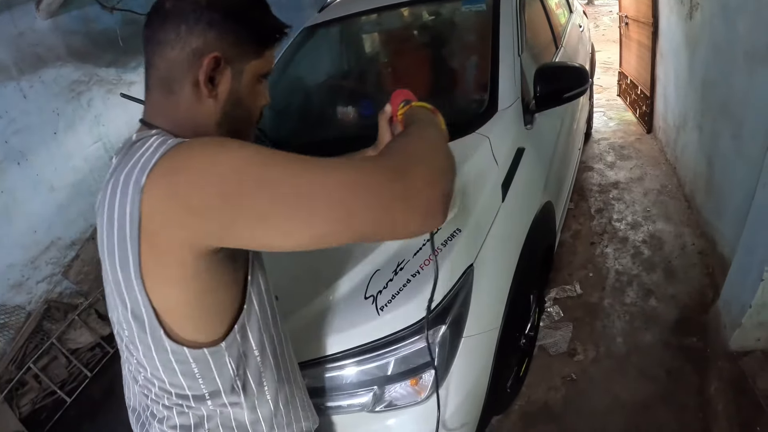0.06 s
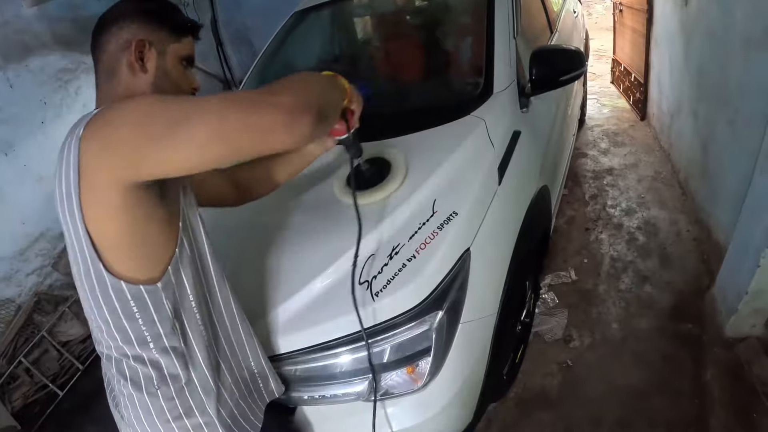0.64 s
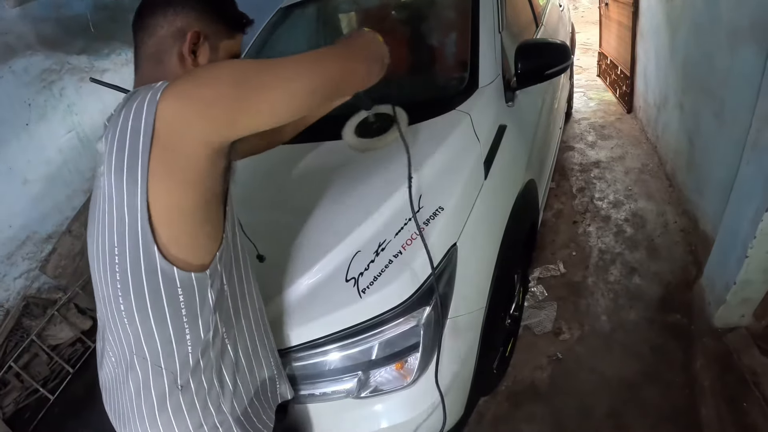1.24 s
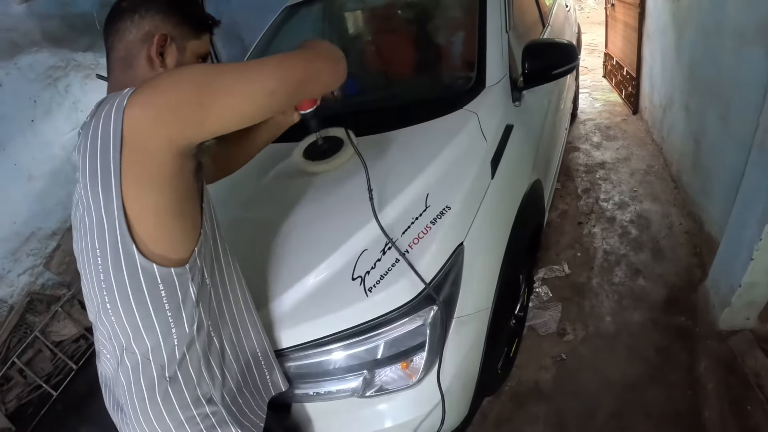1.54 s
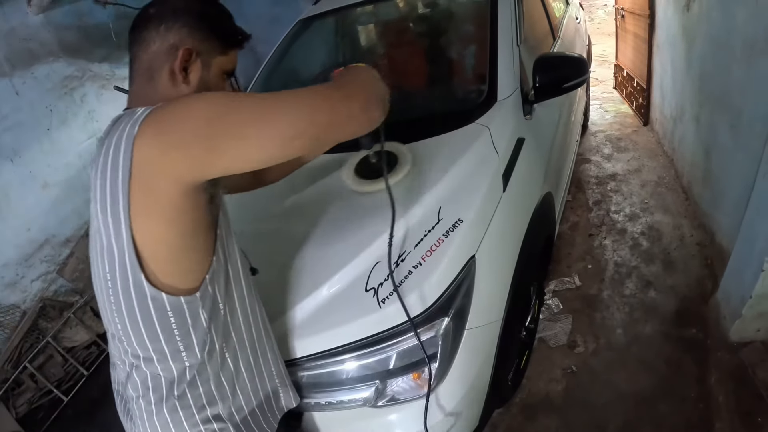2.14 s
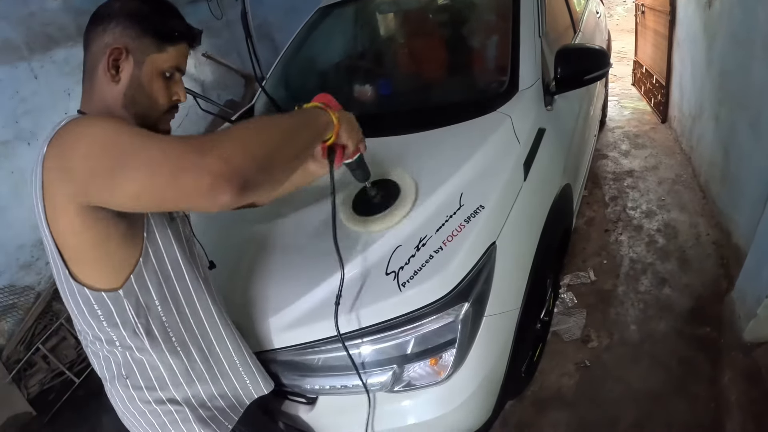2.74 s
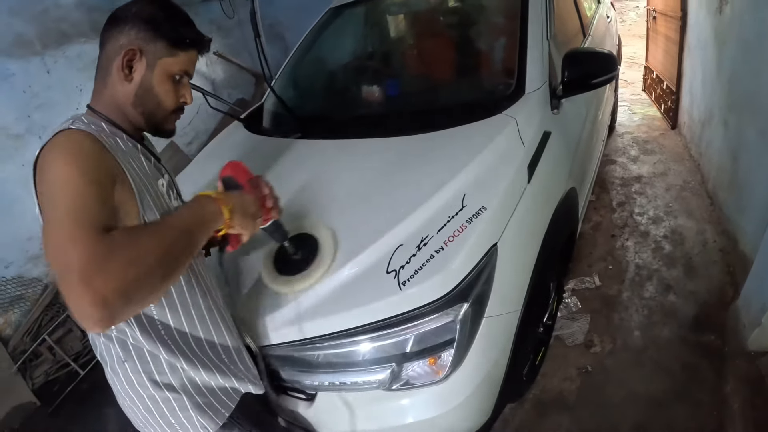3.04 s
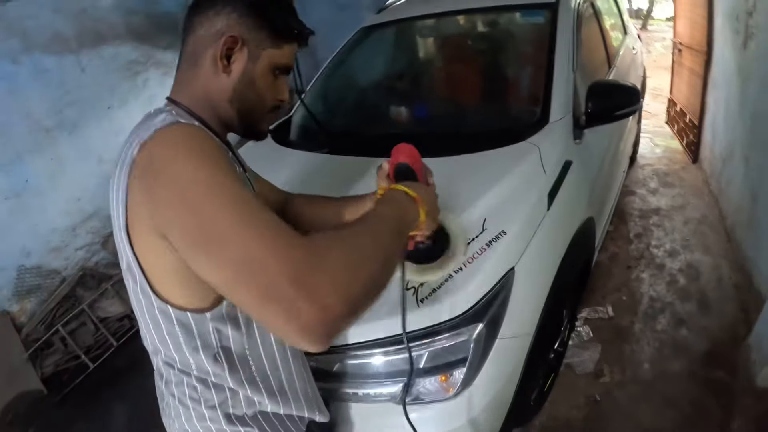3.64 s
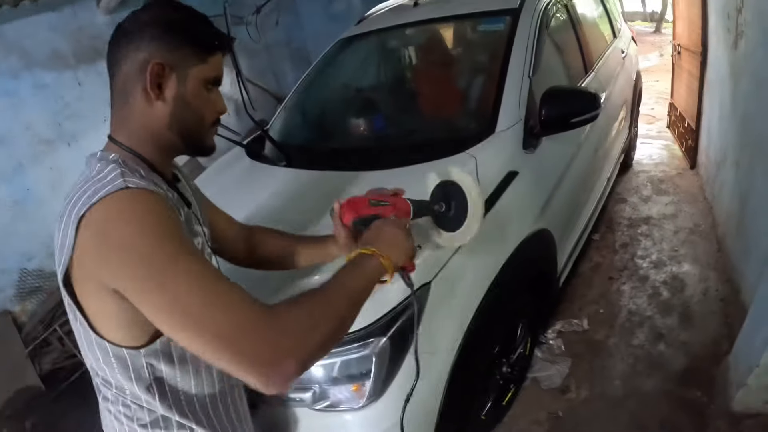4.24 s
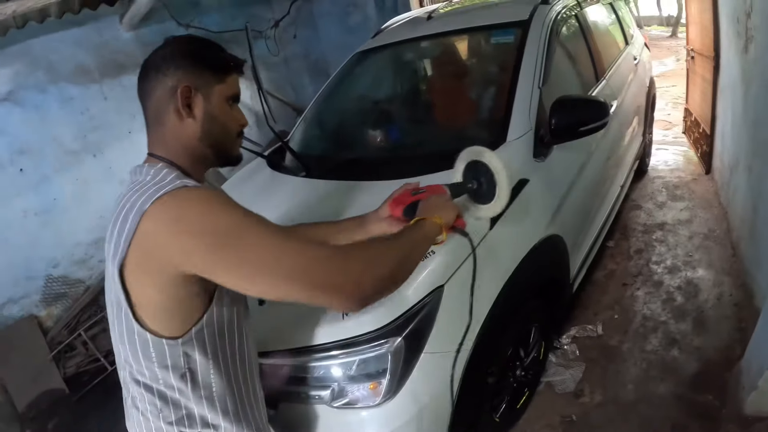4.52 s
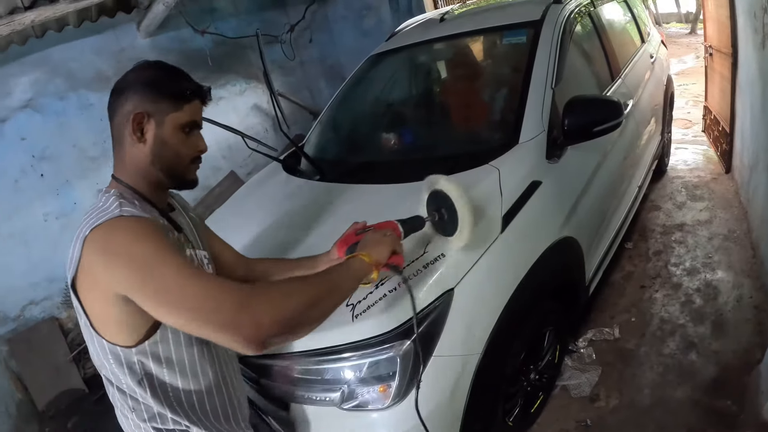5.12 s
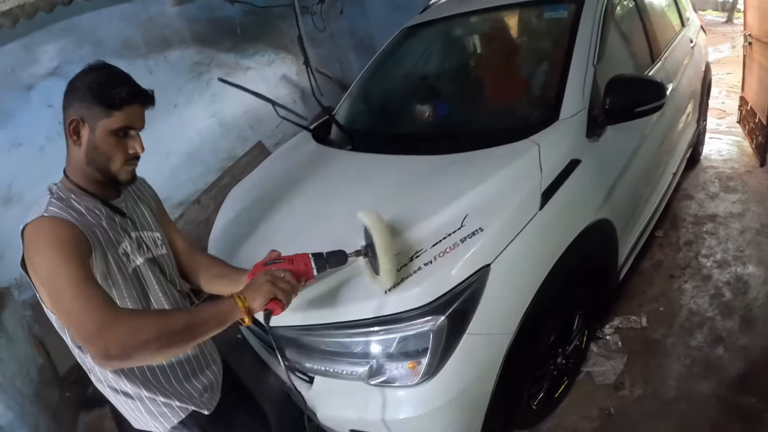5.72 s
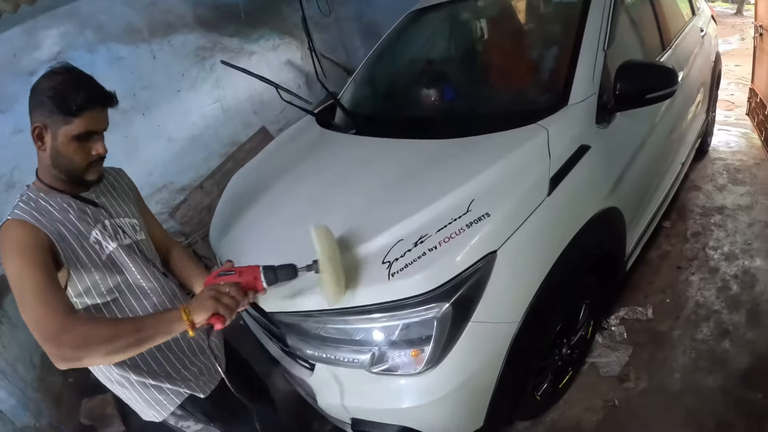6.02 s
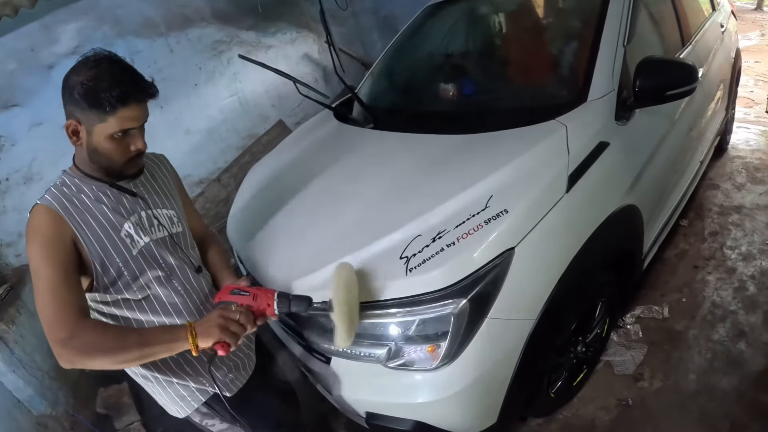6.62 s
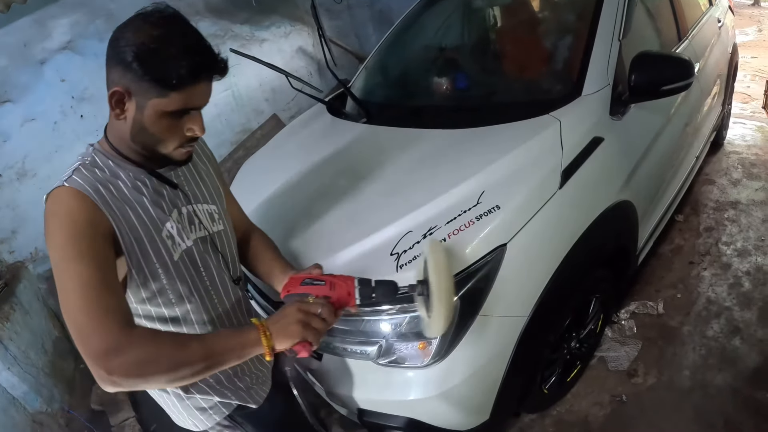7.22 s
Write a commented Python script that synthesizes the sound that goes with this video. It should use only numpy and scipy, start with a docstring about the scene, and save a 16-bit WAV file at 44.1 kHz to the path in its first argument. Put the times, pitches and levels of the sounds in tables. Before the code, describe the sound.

An electric drill runs without a break, spinning a buffing pad over a car bonnet. Its high, rasping gear whine throbs with the pad above a hiss of cooling air. The pitch steps up early on and sags twice under pressure, then settles slightly lower. Brief swells of hiss come and go, and the pad rubs faintly. The mono microphone is a few steps away in a narrow covered yard with a faint outdoor rumble.

```python
"""Buffing a car bonnet in a covered yard

An electric drill spins a buffing pad between close plaster walls; a mono microphone is a few steps off.
The motor sings at multiples of its shaft rate, stepping with the trigger and sagging when the pad is
pressed down. The gears whine and throb with each turn of the pad, and the hiss of cooling air changes as
the tool leans and turns. Brief narrow bands of hiss swell and fade over the drill's whine, and the pad
rubs on the panel above a faint outdoor rumble."""
import sys
import numpy as np
from scipy import signal
from scipy.fft import rfft, irfft, next_fast_len
from scipy.io import wavfile
from scipy.ndimage import uniform_filter1d, map_coordinates

SR = 44100
rng = np.random.default_rng(int(sys.argv[2]) if len(sys.argv) > 2 else 0)


def wav_out(sig):
    """Save sig, one row per channel (or a flat mono array), as 16-bit PCM at SR to the path in sys.argv[1]."""
    wavfile.write(sys.argv[1], SR, np.round(np.clip(np.atleast_2d(sig).T, -1, 1) * 32767).astype(np.int16))


N = 320607
T = np.arange(N) / SR
FFT_SIZE = next_fast_len(N)
FREQ = np.maximum(np.arange(FFT_SIZE // 2 + 1) * SR / FFT_SIZE, 1)
GEAR_RATIO = 18  # shaft turns to one turn of the pad
# pressure on the pad: (time [s], speed lost [%])
PAD_LOAD = [(0.0, 0.6), (0.42, 0.7), (0.5, 1.47), (0.56, 7.6), (0.62, 11.8), (0.7, 6.9), (0.8, 3.7),
            (0.86, 3.27), (1.06, 2.36), (1.2, 1.04), (1.44, 1.25), (1.54, 2.2), (1.64, 0.8), (1.8, 0.3),
            (1.96, 1.72), (2.16, 1.24), (2.42, 1.35), (2.5, 0.67), (2.6, 0.9), (2.66, 1.95), (2.72, 2.05),
            (2.9, 1.37), (2.98, 1.58), (3.16, 0.99), (3.34, 1.14), (3.44, 11.6), (3.46, 13.2), (3.5, 11.6),
            (3.58, 6.7), (3.7, 5.2), (3.88, 6.61), (4.0, 6.7), (4.2, 1.36), (4.54, 0.12), (4.76, 0.96),
            (4.92, 0.44), (5.38, 2.42), (5.46, 2.33), (6.06, 3.02), (6.26, 4.3), (6.4, 3.4), (6.46, 2.45),
            (6.6, 2.4), (7.02, 3.96), (7.18, 3.74), (7.26, 3.6)]


def shaft_rate():
    """The trigger sets the speed, pressure on the pad drags it down, the rotor's inertia rounds both."""
    # trigger steps: (time [s], unloaded shaft rate [Hz])
    trigger = [(0, 331.1), (.274, 350.5), (1.495, 384.1), (2.627, 410), (5.322, 389.8)]
    starts, step_hz = np.transpose(trigger)
    free_hz = step_hz[np.searchsorted(starts[1:], T)]
    spin_up_s = 0.01
    return uniform_filter1d(free_hz * (1 - curve(PAD_LOAD) / 100), int(spin_up_s * SR))


def motor(turns, hz):
    """Magnetic pull hums on even orders, the housing rings and the brushes cross the commutator bars."""
    # two-pole hum: (time [s], level [dB])
    pole_hum = [(0, -82), (.4, -77.5), (.65, -82), (1.05, -84.5), (1.4, -82), (1.62, -75), (1.8, -82.5),
                (2.05, -83), (2.45, -72.5), (2.78, -79.5), (3.12, -70.5), (3.75, -79), (4.2, -79.5),
                (5.1, -81.5), (5.55, -78.5), (5.9, -83), (6.15, -89), (6.45, -80), (6.8, -93), (7.27, -84)]
    # its octave: (time [s], relative level [dB])
    hum_octave = [(0, -62.5), (.3, -57), (.7, -64), (1.4, -67.5), (1.65, -60), (2, -68), (2.35, -58),
                  (2.9, -60.5), (3.2, -53.5), (3.5, -64.5), (3.85, -63), (4.15, -73), (4.45, -62),
                  (5.2, -67.5), (5.8, -68), (6.35, -59), (6.95, -67.5), (7.27, -61.5)]
    # sixth-order whistle: (time [s], level before ringing [dB])
    whistle = [(0, -55.5), (.45, -61), (.65, -63.5), (.88, -55.5), (1.05, -60.5), (1.65, -56.5),
               (1.85, -59), (2.05, -58), (2.4, -64), (2.85, -59.5), (2.98, -55), (3.25, -61), (3.4, -62),
               (3.65, -63), (3.9, -70), (4.12, -63), (4.33, -57), (4.48, -68), (4.7, -70), (5.1, -68),
               (6.15, -77), (6.3, -57.5), (6.55, -66), (6.9, -65), (7.27, -61)]
    # weak lines that come and go as the tool moves: (order [x shaft rate], base level [dB])
    weak_lines = [(8, -69.5), (10, -69), (12, -69), (14, -77.5), (16, -73), (17, -82), (29, -83.5),
                  (31, -77)]
    housing_order, bars = 20, 24
    housing_db = -77 + beam(lean_db=-11, facing_db=30.5) + ringing(housing_order * hz)
    brush_db = -82.5 + beam(lean_db=8, facing_db=19.5) + ringing(bars * hz)
    hum = tone(turns, order=2, db=curve(pole_hum), scatter=0.15, rate=25)
    hum += tone(turns, order=4, db=curve(hum_octave) - 2.5, scatter=0.19, rate=30)
    hum += tone(turns, order=6, db=curve(whistle) + ringing(6 * hz), scatter=0.42, rate=110)
    housing = tone(turns, order=housing_order, db=housing_db, scatter=0.55, rate=120)
    brushes = tone(turns, order=bars, db=brush_db, scatter=0.45, rate=90)
    weak = 0
    for order, db in weak_lines:
        fading_db = 2 * walk(3.57)
        weak += tone(turns, order, db + ringing(order * hz) + fading_db, scatter=0.55, rate=70)
    return hum + housing + brushes + weak


def pinion(turns):
    """Uneven tooth contacts make a rasping whine, harder under load, throbbing once a turn of the pad."""
    # gear whine: (time [s], level with no load [dB])
    mesh_level = [(0, -61), (.15, -58), (.28, -71), (.42, -59), (.52, -63), (.62, -64.5), (.78, -62),
                  (.9, -56.5), (1.02, -56.5), (1.14, -68), (1.36, -70), (1.65, -60), (1.77, -53.5),
                  (1.95, -58.5), (2.08, -68), (2.22, -61), (2.32, -58.5), (2.42, -65), (2.51, -53.5),
                  (2.6, -55), (2.68, -64), (2.93, -76), (3.02, -74), (3.08, -57.5), (3.29, -57.5),
                  (3.36, -66), (3.44, -63), (3.52, -65), (3.59, -70), (3.68, -61), (3.8, -71), (3.9, -63),
                  (4.05, -74), (4.26, -71), (4.41, -57.5), (4.55, -61), (4.67, -67), (4.95, -59),
                  (5.25, -63), (5.4, -63), (5.52, -58), (5.85, -55.5), (5.97, -58.5), (6.16, -60),
                  (6.27, -54.5), (6.36, -58), (6.45, -58), (6.63, -59), (6.78, -59.5), (7.27, -59.5)]
    # its octave: (time [s], level [dB])
    octave_level = [(0, -76), (.25, -59), (.42, -77), (.75, -65), (.88, -57), (1.08, -78), (1.6, -74),
                    (1.9, -63), (2.1, -73), (2.45, -74), (2.8, -71), (3.2, -74), (4.2, -71), (4.45, -67),
                    (4.7, -69), (5.15, -60), (5.3, -59), (5.55, -59), (5.85, -58), (6.1, -70), (6.3, -65),
                    (6.65, -79), (7.27, -75)]
    # swing that the off-centre pad gives the whine: (time [s], depth [0-1])
    wobble = [(0, .28), (.65, 0), (.85, 0.4), (1.05, 0.35), (1.3, 0.2), (1.9, 0.39), (2.6, 0.06), (3, 0.05),
              (5.2, 0.22), (5.5, 0.6), (6.1, 0.57), (6.3, 0.01), (6.9, 0.38), (7.27, 0.53)]
    teeth, db_per_percent = 15, 1.13
    load, depth = curve(PAD_LOAD), curve(wobble)
    mesh_db = curve(mesh_level) + db_per_percent * load
    pad_angle = 2 * np.pi * turns / GEAR_RATIO
    bent_turns = turns + 0.019 * depth * np.cos(pad_angle)  # the pad's load bends the pitch a little
    whine = tone(bent_turns, order=teeth, db=mesh_db, scatter=0.27, rate=320)
    octave = tone(bent_turns, order=2 * teeth, db=curve(octave_level), scatter=1.1, rate=260)
    # an off-centre pinion adds a line on each side, stronger as the load bends its shaft
    runout = 1 + (0.3 + 0.01 * load) * np.cos(2 * np.pi * turns)
    throb = (1 + depth * np.sin(pad_angle)) / np.sqrt(1 + depth ** 2 / 2)
    return (whine * throb + octave * np.sqrt(throb)) * runout


def layshaft(turns):
    """The slower gear stage drones far below the pinion and whines as the pad's edge bites."""
    # low drone: (time [s], level [dB])
    drone_level = [(0, -99), (.45, -92), (.68, -99), (1.2, -93.5), (1.65, -90.5), (2.25, -91), (2.7, -96),
                   (3.3, -91.5), (3.5, -97), (4.5, -92.5), (5.4, -93.5), (5.8, -87), (6.2, -91),
                   (6.45, -88), (6.8, -87), (7, -99), (7.27, -98)]
    # edge whine: (time [s], level [dB])
    edge_level = [(0, -92), (6.05, -81), (6.22, -68), (6.5, -65), (6.68, -64), (6.8, -80), (7.27, -81)]
    mesh_order = 0.586
    drone = tone(turns, order=mesh_order, db=curve(drone_level), scatter=0.25, rate=8)
    drone += tone(turns, order=2 * mesh_order, db=-99.5, scatter=0.5, rate=14)
    return drone + tone(turns, order=8 * mesh_order, db=curve(edge_level), scatter=0.7, rate=70)


def air(turns):
    """Cooling air and brushes hiss; each band beams its own way, pulsing faintly with shaft and pad."""
    # spectrum of the hiss: (frequency [Hz], relative level [dB])
    hiss_colour = [(300, -65), (550, -34.5), (800, -19), (1150, -11.5), (1570, -6.5), (2050, 0.5),
                   (2900, -2.5), (4300, -3), (6200, -3.5), (8100, -1), (10300, -3), (12600, -8.5),
                   (14000, -15.5), (15400, -48)]
    # resonances of housing and vents: (centre [Hz], width [Hz], lift [dB])
    vents = [(1710, 340, 2), (3290, 470, 2), (4760, 300, 1), (7400, 570, 1.5)]
    # bands of the hiss: (centre [Hz], gain on its side [dB], gain facing the microphone [dB])
    bands = [(1130, -3.5, 8.5), (1610, -3, 7.5), (2150, -3.5, 2), (3170, 4, 11.5), (5060, 2.5, 3.5),
             (6080, -0.5, 1.5), (8000, 1, 14.5), (10500, 5.5, 6.5), (12900, 4, 2)]
    # the two lowest bands: (time [s], relative level [dB])
    low_level = [(0, 9), (.45, 7.5), (.7, 3.5), (1.2, 2), (2, 0.5), (2.3, 2.5), (2.85, 0.5), (3.05, 0),
                 (3.48, 0), (3.8, -1), (4.3, -0.5), (5.25, -2), (5.38, 0.5), (5.8, 0), (6.2, -2),
                 (7.27, -4)]
    # the third band: (time [s], relative level [dB])
    mid_level = [(0, -1.5), (.3, -3.5), (.45, -2), (.65, -3), (.9, 0.5), (2.6, 0.5), (3, 0), (4.4, -0.5),
                 (5.6, 3), (5.9, -3.5), (6.2, -1), (6.5, -1.5), (7.27, 0)]
    # the top treble: (time [s], relative level [dB])
    top_level = [(0, -15), (.22, -9), (.45, 0.5), (.85, 2), (1.15, -8.5), (1.4, -1), (1.65, -4),
                 (1.95, 2.5), (2.33, -1.5), (2.55, 1.5), (2.78, 5), (3, 2.5), (3.55, 5.5), (3.8, 3),
                 (3.95, 7), (4.27, 2), (4.65, -1.5), (4.72, -11), (4.8, 2), (5.6, -3.5), (6.6, 1),
                 (7.27, -2)]
    cavities = 1 + sum(resonance(FREQ, hz, width, undb(db) - 1) for hz, width, db in vents)
    spectrum = rfft(rng.standard_normal(FFT_SIZE)) * colour(hiss_colour) * cavities
    log_centres = np.log([hz for hz, _, _ in bands])
    top_shares = np.interp(log_centres, [np.log(7900), log_centres[-1]], [0, 1]) ** 2
    band_db = [beam(lean_db, facing_db) + share * curve(top_level)
               for (_, lean_db, facing_db), share in zip(bands, top_shares)]
    band_db[0] += curve(low_level)
    band_db[1] += curve(low_level)
    band_db[2] += curve(mid_level)
    hiss, flutter_db = 0, 0.3 * walk(90)
    for weights, db in zip(np.eye(len(bands)), band_db):
        band = irfft(spectrum * np.interp(np.log(FREQ), log_centres, weights))[:N]
        flicker_db = 0.65 * walk(40) + 0.35 * walk(5.5)
        hiss += band * level(undb(db + flutter_db + flicker_db))
    pulse = 1 + 0.05 * np.sin(2 * np.pi * turns) + 0.04 * np.sin(2 * np.pi * turns / GEAR_RATIO)
    return level(sliding_notches(reflections(hiss * pulse)), db=-45.8)


def reflections(hiss):
    """A late, inverted path round the tool hollows the hiss; a bounce off the paint adds faint phasing."""
    # path round the tool's body: (time [s], lag [ms], strength [0-1])
    detour_path = [(0, 0.14, 0.26), (2.6, 0.12, 0.14), (2.95, 0.16, 0.23), (3.4, 0.17, 0.4),
                   (3.95, 0.19, 0.22), (4.2, 0.15, 0), (4.7, 0.11, 0.21), (5.3, 0.12, 0.24),
                   (5.55, 0.23, 0.06), (5.8, 0.2, 0.26), (6.02, 0.192, 0.27), (6.15, 0.16, 0.32),
                   (6.3, 0.14, 0.38), (6.45, 0.15, 0.18), (6.7, 0.2, 0.04), (7.27, 0.2, 0.06)]
    times, lag_ms, strength = np.transpose(detour_path)
    detour = np.interp(T, times, strength) * delayed(hiss, np.interp(T, times, lag_ms))
    bounce = undb(-13) * delayed(hiss, ms=0.458 + 0.12 * walk(2))
    return hiss - detour + bounce


def sliding_notches(hiss):
    """Narrow hollows slide through the hiss as the tool moves; a negative depth is a lift."""
    # middle hollow: (time [s], centre [Hz], depth [dB])
    mid_notch = [(0, 4300, -0.5), (.65, 4050, 0), (1.1, 4700, 3), (1.5, 4800, -3), (2.7, 5340, 2.5),
                 (2.95, 6800, 2), (3.2, 6850, 2), (3.5, 6800, 3), (4.1, 6800, 2), (4.35, 6670, -1),
                 (4.5, 5400, 1), (5.3, 5200, 2), (5.8, 5060, -1.5), (6.3, 5150, 3), (6.7, 5100, 4),
                 (7.27, 5000, 4)]
    # treble hollow: (time [s], centre [Hz], depth [dB])
    top_notch = [(0, 8140, 4), (.4, 8400, 0), (1.4, 9400, 3), (2.1, 10200, 2.5), (2.6, 10900, 7),
                 (3.2, 11000, -3), (3.6, 10100, 4), (4.3, 9500, 1.5), (5.35, 9400, -1.5), (5.6, 9300, 1.5),
                 (6, 9800, 2), (6.3, 9700, 4), (6.5, 9400, 5), (6.6, 10800, -4), (6.75, 11800, 6),
                 (7.27, 11400, 5)]
    hz, t, frames = signal.stft(hiss, SR, nperseg=512)
    for notch, width_hz in ((mid_notch, 630), (top_notch, 840)):
        times, centre_hz, depth_db = np.transpose(notch)
        shape = bell(hz[:, None], np.interp(t, times, centre_hz), width_hz)
        frames *= undb(-np.interp(t, times, depth_db) * shape)
    return signal.istft(frames, SR)[1][:N]


def beam(lean_db, facing_db):
    """The dB that a part gains as the drill is laid over and turned toward the microphone."""
    # how the drill is held: (time [s], lean [0 upright, 1 on its side])
    lean = [(0, 0.087), (2.9, 0.081), (3.4, 0.37), (3.9, 0.23), (4.25, 0.85), (4.8, 0.98), (5.4, 1),
            (7.27, 0.83)]
    # where its vents point: (time [s], aim [0 away, 1 at the microphone])
    facing = [(0, 0.012), (.47, 0.36), (.65, 0.16), (1.4, 0.22), (2.3, 0.27), (2.5, 0.48), (2.8, 0.19),
              (3.06, 0.57), (3.16, 0.8), (3.27, 0.86), (3.42, 0.27), (3.65, 0.37), (4.1, 0.1), (4.45, 0.26),
              (4.72, 0.15), (5.5, 0.29), (6.25, 0.6), (6.7, 0.71), (7.27, 0.68)]
    return lean_db * curve(lean) + facing_db * curve(facing)


def ringing(hz):
    """The dB that the housing adds to a line passing through its modes."""
    # narrow housing modes: (centre [Hz], width [Hz], lift [dB])
    modes = [(2360, 91, 5.5), (3020, 120, 3), (4550, 150, 5), (5460, 68, 7), (6750, 220, 9), (7720, 170, 4),
             (8082, 130, 5), (9730, 440, 10.5), (10850, 190, 7), (12000, 180, 7)]
    return sum(resonance(hz, centre, width, db) for centre, width, db in modes)


def hiss_swells():
    """Brief narrow bands of hiss swell and fade over the drill's whine."""
    # swells of hiss: (middle [s], length [s], level [dB], centre [Hz], width [Hz])
    swells = [(.12, 0.28, -59.5, 6600, 400), (.66, 0.18, -60, 4800, 900), (.73, 0.19, -53, 6950, 900),
              (0.881, 0.09, -49, 10250, 700), (1.344, 0.34, -58.5, 3770, 500), (2.52, .2, -57, 3670, 500),
              (2.549, .25, -62, 12180, 1400), (3.02, .1, -55, 2900, 800), (3.21, 0.13, -49, 8150, 300),
              (3.203, .2, -63, 9710, 300), (4.25, 0.15, -56, 3693, 700), (4.526, 0.16, -56, 4910, 896),
              (5.05, 0.18, -57, 4827, 1197), (5.15, 0.26, -55, 9070, 1094), (5.65, 0.41, -56, 11500, 651),
              (6.219, .08, -59.5, 13550, 500), (6.279, .2, -56, 4640, 1002), (6.29, 0.21, -59, 10840, 450)]
    return sum(noise(bell(FREQ, hz, width)) * undb(db) * bell(T, middle, length)
               for middle, length, db, hz, width in swells)


def pad_rub():
    """The pad's fibres drag over the paint and stir the sheet metal; each stroke swells and fades."""
    # low resonances of the bonnet: (centre [Hz], width [Hz], relative level [dB])
    panel_modes = [(364, 50, -4), (458, 46, -2), (616, 100, -9), (960, 110, -8)]
    # dragging strokes: (middle [s], length [s], relative level [dB])
    strokes = [(0.463, 0.2, -82), (.82, 0.21, -80), (1.56, 0.22, -77), (3.17, 0.16, -77), (3.98, 0.15, -80),
               (4.74, 0.38, -74.5), (5.32, 0.27, -77), (5.746, 0.43, -76.5), (6.3, 0.21, -80),
               (6.56, 0.22, -69), (6.76, 0.15, -73.5)]
    power = sum(resonance(FREQ, hz, width, undb(2 * db)) for hz, width, db in panel_modes)
    panel_gain = np.sqrt(power) * colour([(100, -25), (320, 2.5), (900, 7), (2000, -12)])
    swells = sum(undb(db) * bell(T, middle, length) for middle, length, db in strokes)
    return noise(panel_gain) * swells * undb(-2.5 + 0.9 * walk(13) + 1.3 * walk(120))


def yard(x, t60_s=0.18, wet_db=-15):
    """Close plaster walls add a short, dense tail."""
    t = T[:SR // 2]
    tail = rng.standard_normal(len(t)) * np.exp(-np.log(1000) * t / t60_s) * (t > 0.006)
    wet = signal.fftconvolve(x, tail / np.linalg.norm(tail))[:N]
    return (x + undb(wet_db) * wet) / np.sqrt(1 + undb(2 * wet_db))


def outdoor_rumble():
    """A faint, steady rumble lies under the work."""
    # spectrum of the open air: (frequency [Hz], relative level [dB])
    rumble_colour = [(20, 2), (45, -0.5), (100, -1.5), (200, -1), (300, 1), (600, 0.5), (1500, -6),
                     (8000, -61)]
    return noise(colour(rumble_colour)) * undb(-81.5)


def tone(turns, order, db, scatter, rate):
    """One multiple of the shaft rate; reflections off the moving tool make its size and phase waver."""
    waver = 1 + scatter * (walk(rate) + 1j * walk(rate))
    return undb(db) * level(np.real(waver * np.exp(2j * np.pi * order * turns)))


def noise(gain):
    """Noise of rms 1, shaped by this gain per frequency."""
    return level(irfft(rfft(rng.standard_normal(FFT_SIZE)) * gain)[:N])


def walk(rate):
    """A smooth random wander of rms 1, about rate turns a second."""
    hold = int(SR / rate)
    steps = np.repeat(rng.standard_normal(N // hold + 2), hold)
    return level(uniform_filter1d(uniform_filter1d(steps, hold), hold)[:N])


def colour(points):
    """Gain per frequency from (frequency [Hz], level [dB]) points."""
    hz, db = np.transpose(points)
    return undb(np.interp(np.log(FREQ), np.log(hz), db))


def curve(table):
    """Rows of (time [s], value), joined by straight lines."""
    return np.interp(T, *np.transpose(table))


def resonance(hz, centre, width, height):
    """A resonant peak, with its width taken at half height."""
    return height / (1 + (2 * (hz - centre) / width) ** 2)


def bell(x, centre, width):
    """A Gaussian bump of height 1."""
    return np.exp(-2 * ((x - centre) / width) ** 2)


def delayed(x, ms):
    """The sound arriving late by a moving lag."""
    return map_coordinates(x, [(T - ms / 1000) * SR], mode="nearest")


def level(x, db=0):
    """Set the rms level."""
    return x * undb(db) / np.sqrt(np.mean(x ** 2))


def undb(db):
    """Decibels to gain."""
    return 10 ** (np.asarray(db) / 20)


def scene():
    """One shaft drives every part of the drill; tool, pad and yard reach both channels alike."""
    hz = shaft_rate()
    turns = np.cumsum(hz) / SR
    drill = motor(turns, hz) + pinion(turns) + layshaft(turns) + air(turns)
    rumble = outdoor_rumble()
    return np.tile(yard(drill + pad_rub() + hiss_swells()) + rumble, (2, 1))


def record(dry):
    """At the microphone the level dips for an instant now and then, and the phone cuts the top."""
    # brief dips: (middle [s], length [s])
    dips = [(.3193, .0015), (.3994, .004), (1.0371, .0045), (1.434, .0033)]
    dip_db, top_hz = -24, 15000
    dipped = np.any([np.abs(T - middle) < length / 2 for middle, length in dips], axis=0)
    gain = uniform_filter1d(np.where(dipped, undb(dip_db), 1), size=32)
    top_cut = signal.ellip(8, 0.2, 70, top_hz, fs=SR, output="sos")
    return signal.sosfilt(top_cut, dry * gain)


dry = scene()
out = record(dry)
wav_out(out)
```